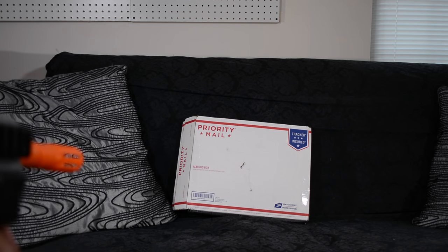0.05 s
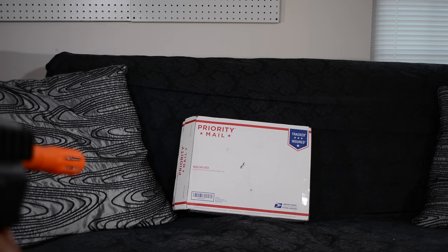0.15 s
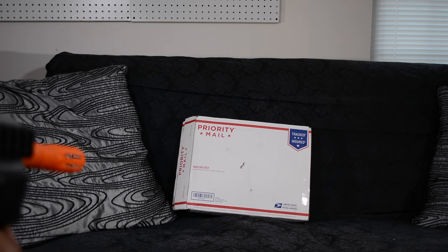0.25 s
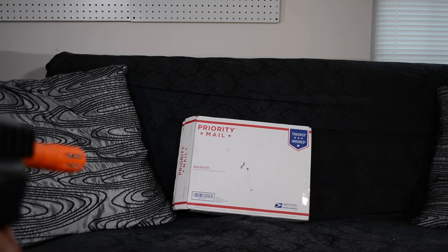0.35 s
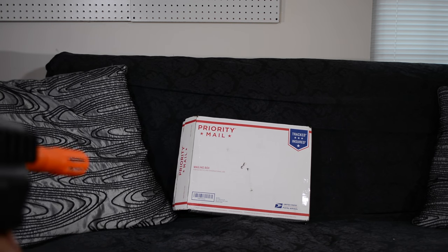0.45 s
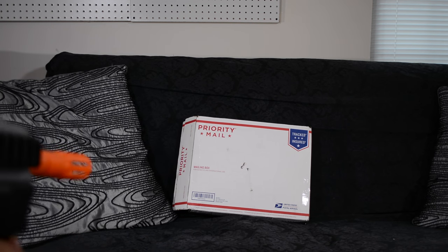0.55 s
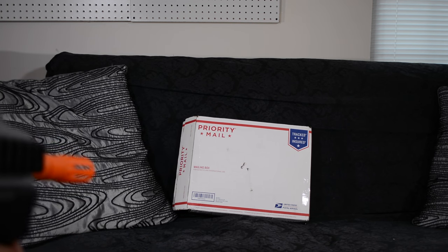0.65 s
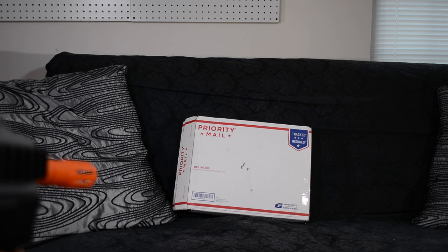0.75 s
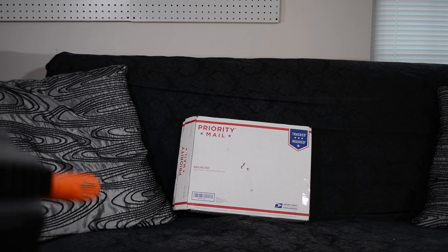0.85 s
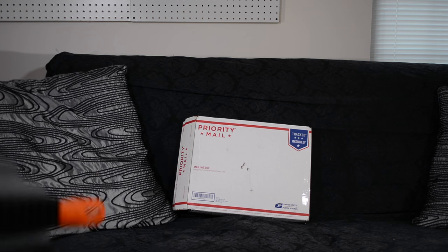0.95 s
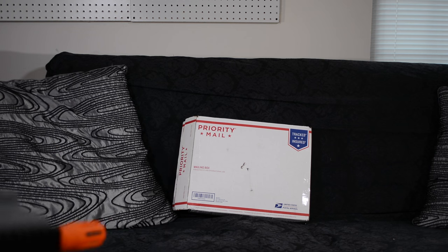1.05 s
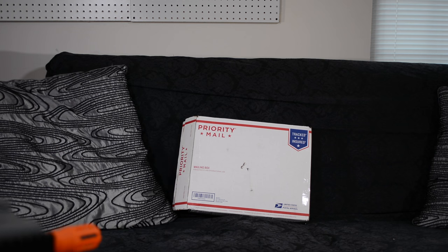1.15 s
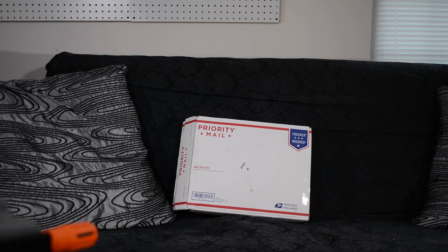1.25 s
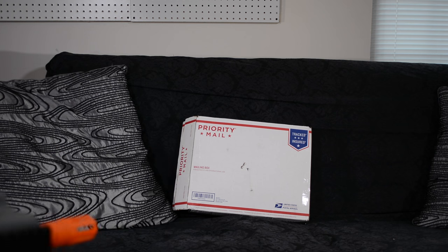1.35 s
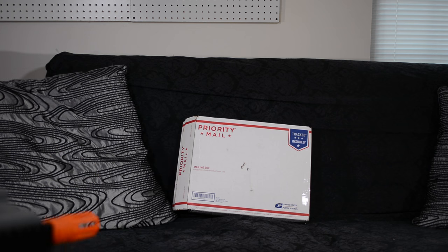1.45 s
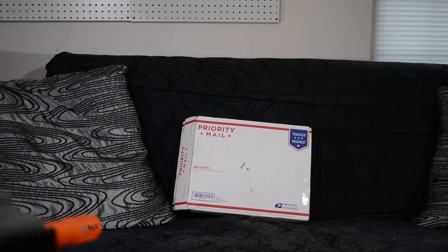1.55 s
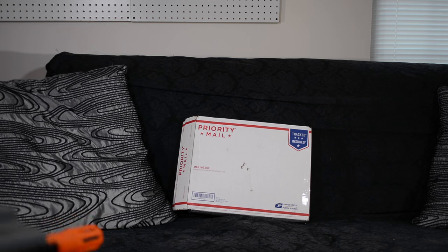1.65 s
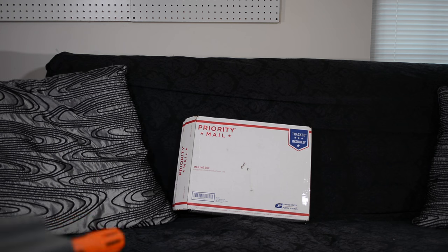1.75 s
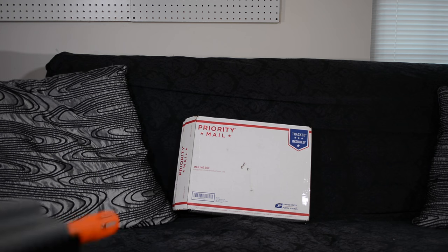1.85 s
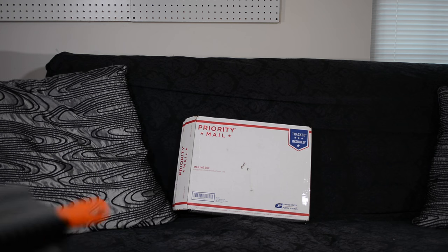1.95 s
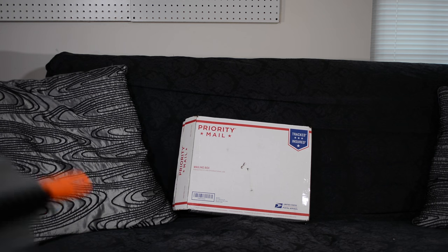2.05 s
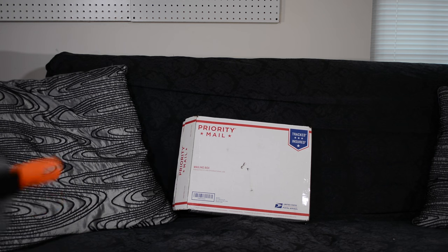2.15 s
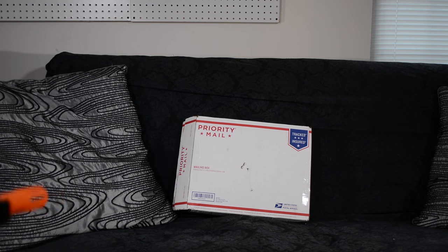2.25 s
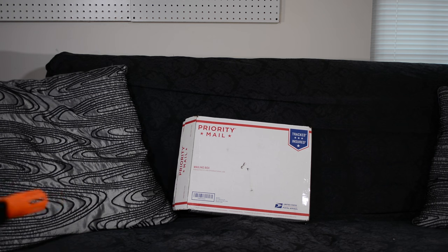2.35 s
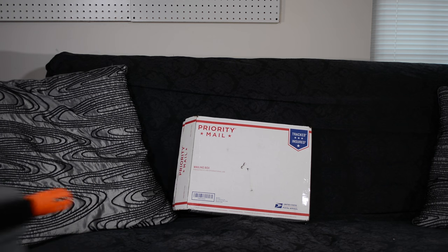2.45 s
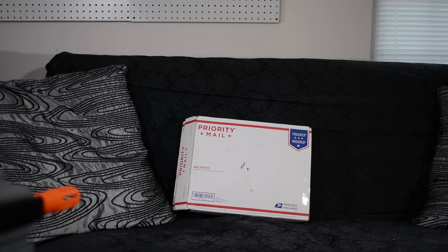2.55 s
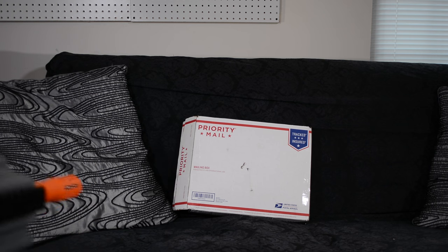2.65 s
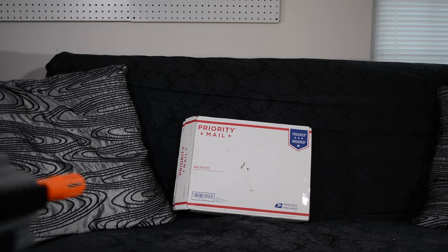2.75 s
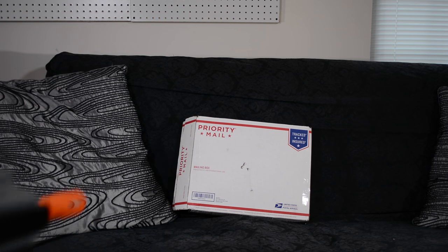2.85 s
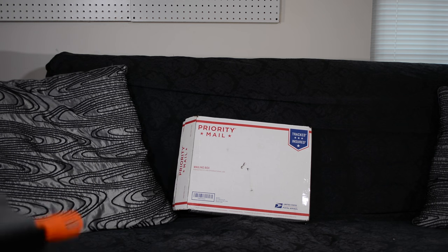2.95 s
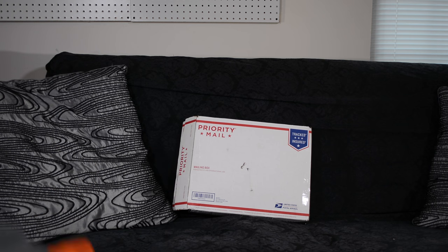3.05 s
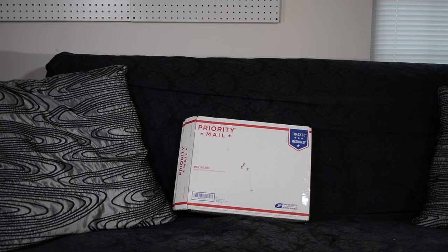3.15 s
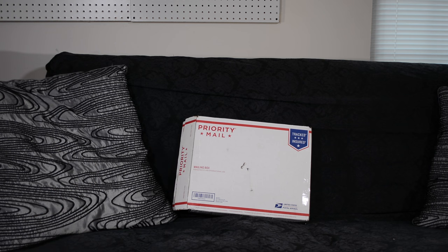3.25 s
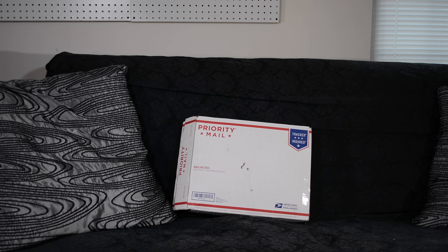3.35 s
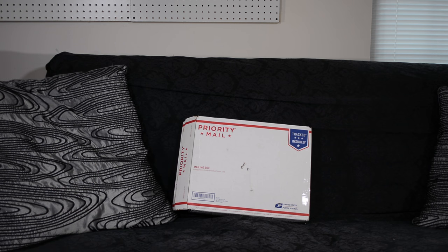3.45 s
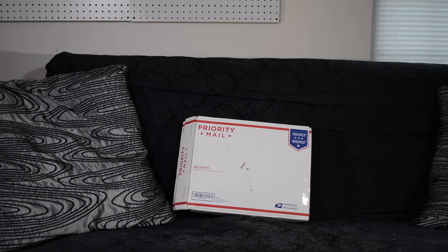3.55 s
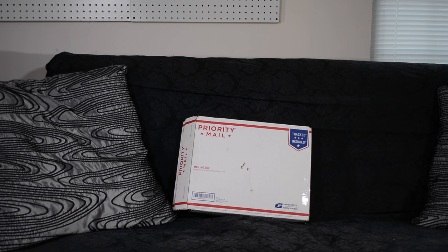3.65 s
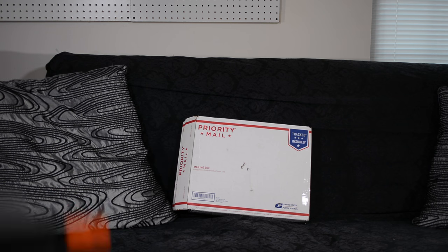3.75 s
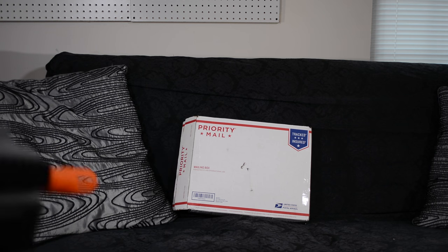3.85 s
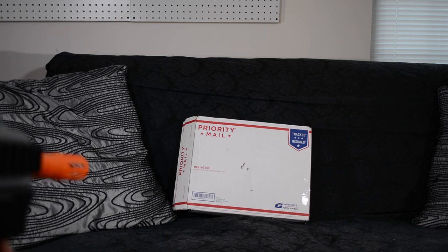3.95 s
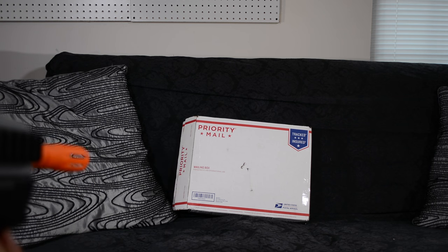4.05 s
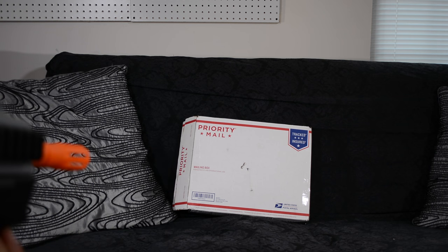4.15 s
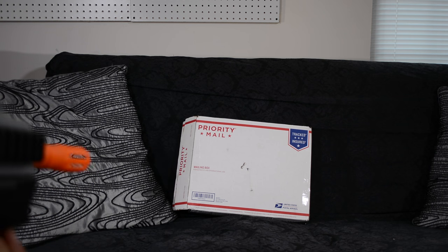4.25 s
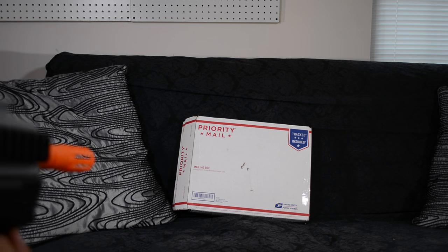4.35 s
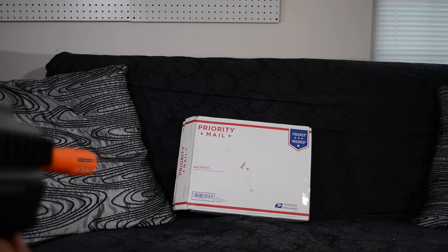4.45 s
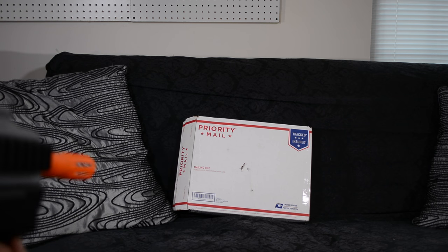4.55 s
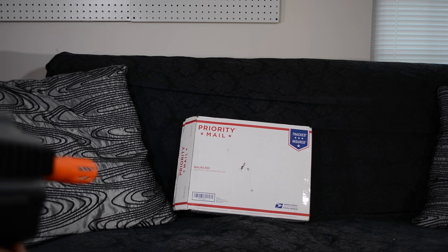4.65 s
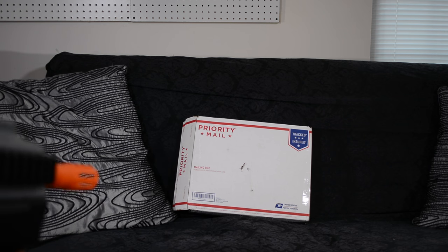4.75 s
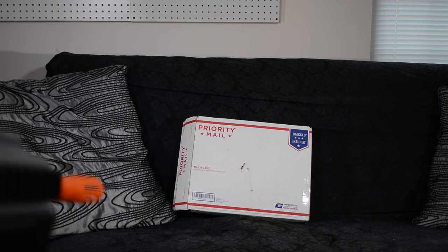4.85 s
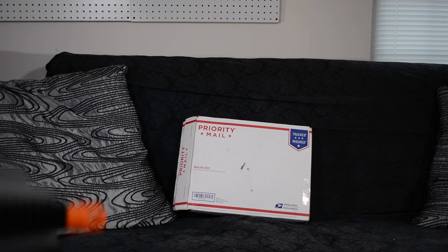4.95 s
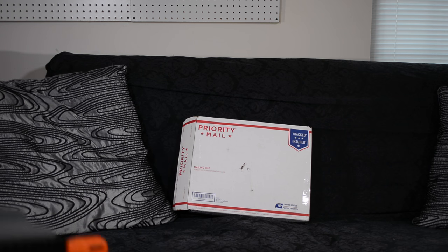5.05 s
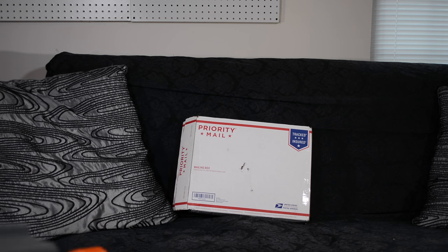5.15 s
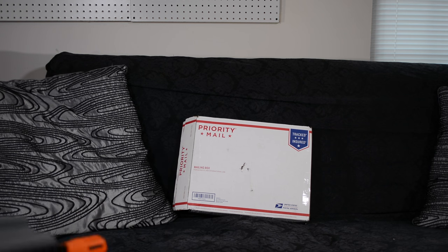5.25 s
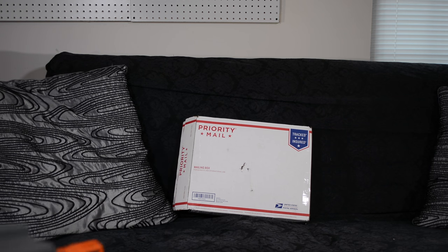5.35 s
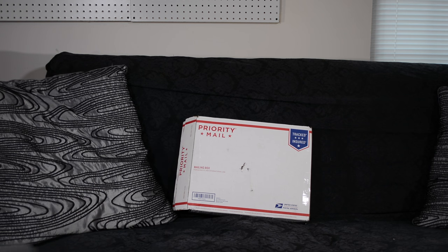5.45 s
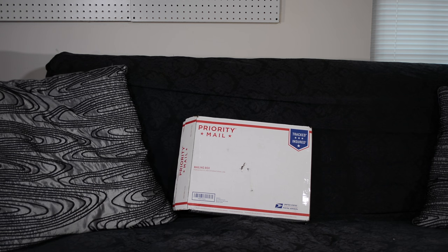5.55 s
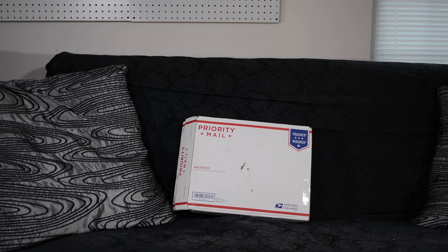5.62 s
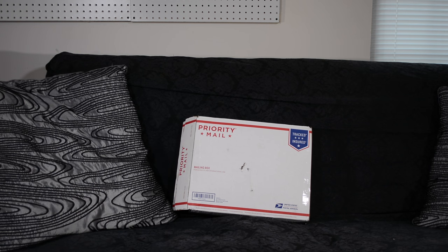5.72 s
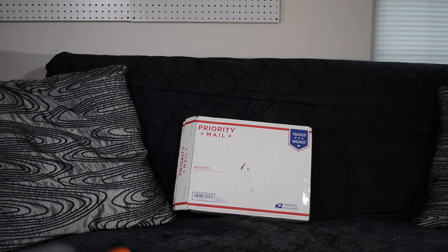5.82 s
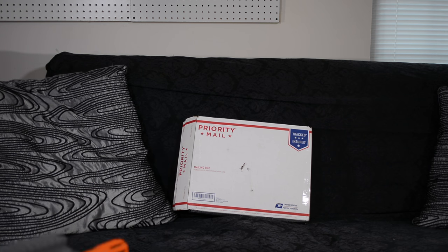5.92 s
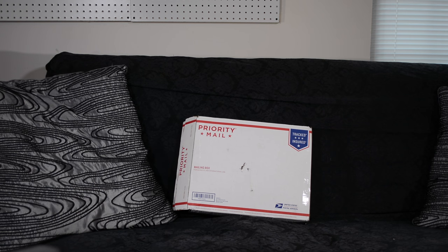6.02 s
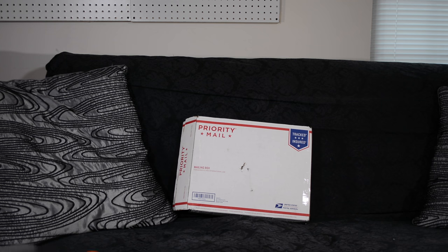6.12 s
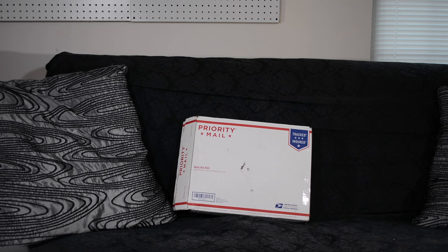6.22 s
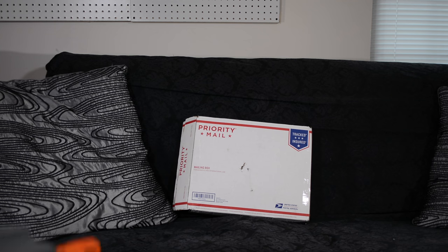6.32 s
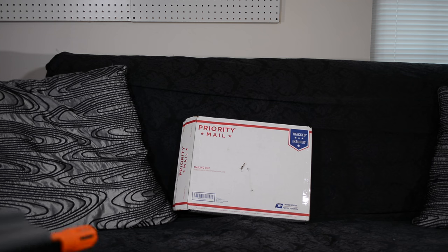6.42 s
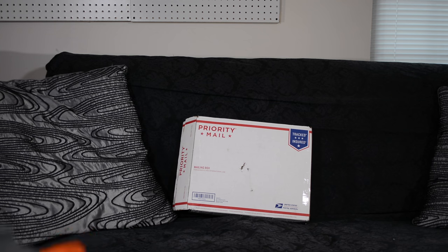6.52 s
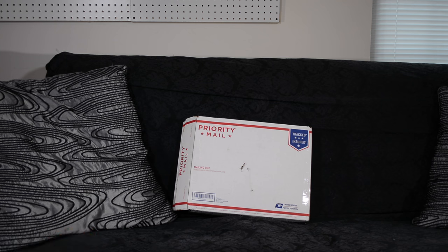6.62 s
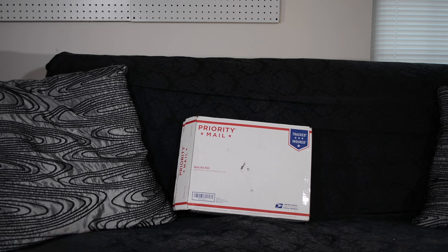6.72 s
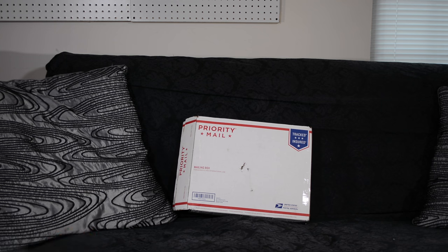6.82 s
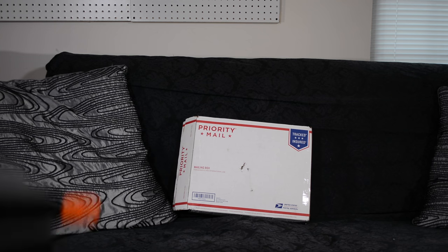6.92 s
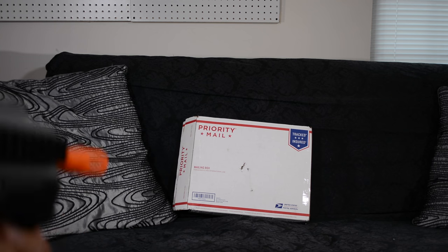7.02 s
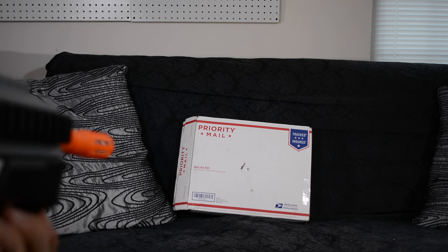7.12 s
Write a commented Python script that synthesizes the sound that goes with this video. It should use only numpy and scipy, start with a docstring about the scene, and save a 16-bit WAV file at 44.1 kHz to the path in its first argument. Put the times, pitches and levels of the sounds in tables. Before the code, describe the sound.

Two loud spring blaster shots hit a cardboard box in a small room, each trailed by rattling bolt cycling and a hard latching clack.

```python
"""A spring-powered foam dart blaster fires twice at a cardboard box on a sofa, close to the microphone.
Each shot sums noise bursts (sear crack, piston slam, dart smack) and damped modes (muzzle pop, box,
ringing spring and tube), and overloads the input softly.
Bolt handling adds latch bursts, shell-filtered clicks and bumps, and sliding friction noise.
A small room adds diffuse tails; quiet air noise and a faint appliance hum lie underneath."""
import sys
import numpy as np
from scipy import signal
from scipy.fft import rfft, irfft, next_fast_len
from scipy.io import wavfile
from scipy.ndimage import uniform_filter1d, map_coordinates

SR = 44100
rng = np.random.default_rng(int(sys.argv[2]) if len(sys.argv) > 2 else 0)


def wav_out(sig):
    """Save sig, one row per channel (or a flat mono array), as 16-bit PCM at SR to the path in sys.argv[1]."""
    wavfile.write(sys.argv[1], SR, np.round(np.clip(np.atleast_2d(sig).T, -1, 1) * 32767).astype(np.int16))


N = 316638


def amp(db):
    """Decibels to gain."""
    return 10 ** (np.asarray(db) / 20)


def unit(x):
    """Scale to rms 1."""
    return x / np.sqrt(np.mean(x ** 2) + 1e-20)


def crest(x):
    """Scale so that the loudest 128 samples (2.9 ms) have rms 1."""
    return x / np.sqrt(uniform_filter1d(x ** 2, size=128).max() + 1e-20)


def along(points, hz):
    """Interpolate (frequency [Hz], value) points on a log frequency axis."""
    point_hz, values = np.transpose(points)
    return np.interp(np.log(hz + 1), np.log(point_hz), values)


def clock(count):
    """Seconds for count samples."""
    return np.arange(count) / SR


def add(track, start_s, sound):
    """Mix a sound into a track at start_s."""
    part = track[round(start_s * SR):][:len(sound)]
    part += sound[:len(part)]


def filtered(x, response):
    """Multiply the spectrum of x by a complex response of frequency."""
    size = next_fast_len(len(x) + SR // 8)
    hz = np.fft.rfftfreq(size, 1 / SR)
    return irfft(rfft(x, size) * response(hz), size)[:len(x)]


def causal(x, gain):
    """Minimum-phase filter with the given gain on an even frequency grid."""
    cepstrum = irfft(np.log(gain + 1e-6))
    half = len(cepstrum) // 2
    # fold the cepstrum onto positive time
    cepstrum[1:half] *= 2
    cepstrum[half + 1:] = 0
    impulse = irfft(np.exp(rfft(cepstrum)))
    return signal.fftconvolve(x, impulse)[:len(x)]


def coloured(x, spectrum, size=4096):
    """Filter x by a (frequency [Hz], level [dB]) spectrum."""
    hz = np.fft.rfftfreq(size, 1 / SR)
    return causal(x, amp(along(spectrum, hz)))


def burst(rise_s, hold_s, t60_s, size=8192):
    """Contact noise that swells, holds and dies away, with spectral gaps partly filled."""
    t = clock(size)
    decay = amp(-60 * np.maximum(t - rise_s - hold_s, 0) / t60_s)
    noise = rng.standard_normal(size) * np.minimum(t / rise_s, 1) * decay
    power = np.abs(uniform_filter1d(np.abs(rfft(noise)) ** 2, size=21))
    return causal(noise, (power / power.mean() + .1) ** -.25)


def fading(spectrum, t60_s, count=SR):
    """Many close modes dying together, heard as fading noise."""
    return unit(coloured(rng.standard_normal(count), spectrum)) * amp(-60 * clock(count) / t60_s)


def ring(modes, attack_s, scatter_db, count=SR):
    """Sum of damped sine modes with randomly scattered strengths and a soft onset."""
    t = clock(count)
    tones = np.zeros(count)
    for k, (hz, db, t60_s) in enumerate(modes):
        level_db = db + scatter_db * rng.standard_normal() - 60 * t / t60_s
        tones += (-1) ** k * amp(level_db) * np.sin(2 * np.pi * hz * t)
    return tones * (1 - np.exp(-t / attack_s))


def make_up(mix, db, bright_db):
    """Levels of the parts of a sound from its strength and brightness."""
    return [db + offset_db + slope * bright_db for offset_db, slope in mix]


# plastic shell resonances: (frequency [Hz], width [Hz], level [dB])
SHELL_MODES = [(115, 140, -9), (275, 106, 1), (441.2, 147, 2), (716, 110, 3), (1002, 120, 0),
               (1342, 300, 0.5), (2346, 610, -2), (3800, 1100, -1.5), (5020, 420, 3.5), (5880, 1300, -3),
               (10780, 5600, -18)]


def shell(hz):
    """Complex response of the hollow plastic body: parallel resonators of alternating sign."""
    total = 0
    for k, (centre_hz, width_hz, db) in enumerate(SHELL_MODES):
        damping = 1j * hz * width_hz
        total = total + (-1) ** k * amp(db) * damping / (centre_hz ** 2 - hz ** 2 + damping)
    return total


# room decay: (frequency [Hz], t60 [s])
ROOM_T60 = [(100, 0.35), (280, 0.37), (500, .31), (800, 0.47), (2000, 0.36), (5000, 0.37), (8000, 0.34),
            (12000, 0.31), (16000, 0.043)]
# wall reflection spectrum: (frequency [Hz], relative level [dB])
WALL_SPECTRUM = [(40, -16.5), (150, -7.5), (450, -1.5), (800, -3), (2000, -4.5), (5000, -4), (9000, 0.5),
                 (16000, -6)]


def in_room(x, wet_db, build_s):
    """Direct sound plus a diffuse tail that builds up as the walls answer."""
    hz, t, cells = signal.stft(rng.standard_normal(SR * 3 // 4), SR, nperseg=256)
    decay = amp(-60 * t / along(ROOM_T60, hz)[:, None])
    tail = signal.istft(cells * decay, SR, nperseg=256)[1]
    tail = tail * (1 - np.exp(-(clock(len(tail)) / build_s) ** 2))
    response = coloured(tail / np.linalg.norm(tail), WALL_SPECTRUM)
    return x + amp(wet_db) * signal.fftconvolve(x, response)[:N]


# room air spectrum: (frequency [Hz], relative density [dB per Hz])
AIR_SPECTRUM = [(25, -11), (100, -8), (260, -9.5), (400, -13.5), (700, -20), (1800, -26.5), (2450, -21),
                (3000, -28.5), (5000, -31), (10000, -39), (16000, -39.5)]
# faint appliance tones: (frequency [Hz], rms level [dB])
HUM_TONES = [(118.4, -80), (263.8, -80.5), (2428, -80)]


def room_tone():
    """Quiet air noise with steady sines of appliance hum."""
    t = clock(N)
    hum = sum(amp(db) * np.sqrt(2) * np.sin(2 * np.pi * hz * t) for hz, db in HUM_TONES)
    air = unit(coloured(rng.standard_normal(N), AIR_SPECTRUM))
    return amp(-63.5) * air + hum


def friction(spectrum, slips_per_s, grit):
    """Sparse random slips of uneven size over smooth rubbing noise."""
    slips = (rng.random(N) < slips_per_s / SR) * rng.uniform(-1.2, 1, N)
    return unit(coloured(rng.standard_normal(N) + grit * unit(slips), spectrum))


STROKE_RISE_S, STROKE_SAG_DB_PER_S, STROKE_STOP_DB_PER_S = 0.029, 34.5, 263.5


def push(length_s, sag_db_per_s):
    """Envelope of one movement: it gets going, eases off and stops."""
    t = clock(2 * SR)
    fall_db = sag_db_per_s * t + STROKE_STOP_DB_PER_S * np.maximum(t - length_s, 0)
    return np.minimum(t / STROKE_RISE_S, 1) * amp(-fall_db)


# bolt slides: (start [s], length [s], strength [dB], brightness [dB])
STROKES = [(1.727, 0.045, -32.5, -3.5), (1.863, .12, -39, 3.5), (2.002, 0.086, -54, -1),
           (2.236, 0.04, -35, -1), (2.677, 0.089, -48.5, -2), (2.871, 0.074, -45.5, 0.5),
           (2.942, 0.052, -46, -12), (5.502, 0.067, -38.5, -2.5), (5.614, 0.18, -40, 3),
           (6.004, 0.022, -40.5, -4.5), (6.4, .09, -49.5, 0), (6.488, 0.057, -42.5, -0.5),
           (6.538, .045, -41.5, -5), (7.028, 0.018, -54.5, -4.5)]
# blaster shifting in the hands, also timing the rattles: (start [s], length [s], strength [dB])
HANDLING = [(1.696, 1.38, -64.5), (3.078, 0.27, -69), (3.378, 0.55, -74), (5.15, 1.1, -66.5),
            (6.424, 0.29, -63), (6.919, 0.28, -73)]
# scrape, rasp, hiss: (level re strength [dB], gain per brightness [dB/dB])
STROKE_MIX = [(-0.5, -0.1), (-1, 0.45), (-9.5, 1.95)]
# sliding spectra: (frequency [Hz], relative density [dB per Hz])
SCRAPE_SPECTRUM = [(40, -26), (200, -16), (330, -10), (480, -6.5), (620, -6), (750, 3), (950, -5.5),
                   (1350, -2.5), (2100, -6), (3000, -9.5), (6000, -60.5)]
RASP_SPECTRUM = [(1200, -42), (2500, -3.5), (3500, -2), (4200, -1.5), (5100, -2.5), (6400, -4),
                 (8000, -18.5), (14000, -43.5)]
HISS_SPECTRUM = [(3500, -42), (7000, 0), (9000, -2.5), (12500, -7.5), (14500, -14.5), (16000, -24.5)]
HANDLING_BRIGHT_DB = 0.5
JUDDER_PER_S, JUDDER_DB = 85, 1.9


def strokes():
    """Friction of the bolt along shell and guides, and faint rubbing hands; an uneven push judders it."""
    layers = [friction(SCRAPE_SPECTRUM, slips_per_s=230, grit=0.93),
              friction(RASP_SPECTRUM, slips_per_s=700, grit=0.67),
              friction(HISS_SPECTRUM, slips_per_s=2400, grit=.8)]
    moves = [(start_s, push(length_s, STROKE_SAG_DB_PER_S), db, bright_db)
             for start_s, length_s, db, bright_db in STROKES]
    moves += [(start_s, push(length_s, 0), db, HANDLING_BRIGHT_DB) for start_s, length_s, db in HANDLING]
    gains = np.zeros((3, N))
    for start_s, envelope, db, bright_db in moves:
        for gain, part_db in zip(gains, make_up(STROKE_MIX, db, bright_db)):
            add(gain, start_s, amp(part_db) * envelope)
    wander = map_coordinates(rng.standard_normal(SR // 8), [clock(N) * JUDDER_PER_S], mode="mirror")
    sliding = amp(JUDDER_DB * wander) * (gains * layers).sum(axis=0)
    return in_room(sliding, wet_db=-9, build_s=0.0015)


# bolt against its end stops, hardest when pushed home: (time [s], strength [dB])
BUMPS = [(1.731, -38.5), (2.876, -32.5), (2.9346, -26.5), (2.9449, -29.5), (2.951, -36), (5.287, -47.5),
         (5.502, -39), (6.507, -34.5), (6.559, -26), (6.567, -31)]
# bump softened by the hand: (frequency [Hz], relative density [dB per Hz])
BUMP_SPECTRUM = [(90, -3), (220, 4), (450, 2.5), (900, -6.5), (1600, 1), (2600, -10.5), (7000, -26),
                 (16000, -31)]


def bumps():
    """One blunt push through the shell, plus a short shudder of the parts inside."""
    out = np.zeros(N)
    for time_s, db in BUMPS:
        blow = filtered(signal.unit_impulse(SR // 8), shell)
        shudder = filtered(burst(rise_s=.002, hold_s=.002, t60_s=0.068), shell)
        add(out, time_s, amp(db + 0.5) * crest(coloured(blow, BUMP_SPECTRUM)))
        add(out, time_s, amp(db - 1.5) * crest(coloured(shudder, BUMP_SPECTRUM)))
    return in_room(out, wet_db=-12.5, build_s=.006)


RATTLES_PER_S, RATTLE_DB, RATTLE_BRIGHT_DB, RATTLE_SPREAD_DB = 12, 7, -2.5, 1.5


def rattles():
    """Loose parts tap once at a chance moment in each time slot of the handling: rows as in CLICKS."""
    taps = []
    for start_s, length_s, db in HANDLING:
        for slot, (when, size, colour) in enumerate(rng.uniform(-1, 1, (40, 3))):
            delay_s = (slot + (when + 1) / 2) / RATTLES_PER_S
            if delay_s < length_s:
                tap_db = db + RATTLE_DB + RATTLE_SPREAD_DB * size
                bright_db = RATTLE_BRIGHT_DB + 2 * RATTLE_SPREAD_DB * colour
                taps.append((start_s + delay_s, tap_db, bright_db))
    return taps


# plastic contacts of trigger, bolt and grip: (time [s], strength [dB], brightness [dB])
CLICKS = [(.538, -33.5, 22), (.9632, -40.5, 7), (1.0312, -36.5, 5.5), (1.4274, -56.5, 1), (1.4996, -52, -6),
          (1.6263, -55, -8), (1.6493, -27.5, 1), (1.738, -33.5, -5), (2.184, -38, -2), (2.191, -33, -1.5),
          (2.243, -37.5, -6), (2.2495, -30, 0.5), (2.4033, -60.5, -22), (2.4637, -36.5, 2),
          (2.5505, -54, -20), (2.6038, -30, 0), (2.6559, -32, 10), (2.705, -48.5, -8), (2.7479, -31.5, 5),
          (2.768, -40, -9), (2.967, -45, 7), (2.9917, -45, 10), (3.1288, -49.5, -9), (3.149, -52, -11),
          (3.248, -55.5, -9.5), (3.355, -62.5, -12), (3.503, -59, 3), (3.708, -60.5, -9),
          (3.8215, -45, 14.5), (3.9494, -57, -3), (4.0672, -60.5, -8), (4.8055, -37, 10.5), (4.831, -42, 0),
          (4.9441, -40, 8.5), (5.1275, -48.5, -7), (5.2199, -35.5, 8), (5.228, -39.5, 7),
          (5.309, -52, -5.5), (5.3447, -41.5, 9), (5.359, -48, -11), (5.3696, -31, 1.5),
          (5.514, -37.5, -11.5), (5.65, -31.5, 2), (5.739, -30.5, 14.5), (5.967, -49, -9),
          (6.0229, -34.5, 3.5), (6.052, -44.5, -14.5), (6.149, -46.5, -9), (6.1724, -37.5, 2),
          (6.227, -48.5, -15), (6.3015, -44, 3.5), (6.3887, -29, 0.5), (6.4123, -36.5, 15),
          (6.4579, -35.5, -5), (6.479, -43.5, 15), (6.5526, -33.5, 10.5), (6.6286, -39, 3),
          (6.6745, -44, 1.5), (6.691, -47.5, -2), (6.8187, -60, -18), (7.0396, -45, 10), (7.126, -60, -14)]
# thud, knock, click, tick: (low edge [Hz], high edge [Hz])
CLICK_BANDS = [(70, 600), (600, 2500), (2500, 7000), (7000, 16000)]
# thud, knock, click, tick: (level re strength [dB], gain per brightness [dB/dB])
CLICK_MIX = [(-11, -0.52), (1, -.5), (-1, .5), (-18, 0.81)]
# wire spring wash: (frequency [Hz], relative density [dB per Hz])
WIRE_SPECTRUM = [(400, -34), (750, -10), (1400, -1), (2600, -21), (3100, -8.5), (4200, -6.5), (5150, 4.5),
                 (6200, -32), (8000, -14), (14000, -34.5)]
# small return spring modes: (frequency [Hz], relative level [dB], t60 [s])
RETURN_SPRING_MODES = [(3440, -5, 0.19), (4140, -4, 0.26), (4700, -10.5, 0.26), (5040, -5.5, 0.15),
                       (5050, -2.5, 0.25), (5870, -9.5, 0.5), (8270, -16, .27)]


def clicks():
    """Short contacts excite the shell in four bands and set the wire and return springs ringing."""
    sharp, thuds, wires = np.zeros((3, N))
    bands = [signal.butter(3, edges_hz, "bandpass", fs=SR, output="sos") for edges_hz in CLICK_BANDS]
    for time_s, db, bright_db in list(CLICKS) + rattles():
        thud_db, knock_db, click_db, tick_db = make_up(CLICK_MIX, db, bright_db)
        # the parts wobble a little longer than they crack
        wobble = filtered(burst(rise_s=0.00042, hold_s=0.001, t60_s=0.042), shell)
        crack = filtered(burst(rise_s=0.00027, hold_s=0.0011, t60_s=0.026), shell)
        sources = (wobble, wobble, crack, crack)
        thud, knock, click, tick = (crest(signal.sosfilt(band, x)) for band, x in zip(bands, sources))
        add(thuds, time_s - .002, amp(thud_db) * thud)
        add(sharp, time_s, amp(knock_db) * knock + amp(click_db) * click + amp(tick_db) * tick)
        wash = fading(WIRE_SPECTRUM, t60_s=0.45, count=SR // 2)
        add(wires, time_s, amp(click_db - 42) * wash)
        springs = ring(RETURN_SPRING_MODES, attack_s=.001, scatter_db=5.5, count=SR // 3)
        add(wires, time_s, amp(click_db - 26) * springs)
    sharp = in_room(sharp, wet_db=-7.5, build_s=.004)
    return sharp + in_room(thuds, wet_db=-9.5, build_s=0.0073) + wires


# piston latching at the end of the pull: (time [s], strength [dB])
LATCHES = [(2.0755, -11), (5.820, -10.5)]
# latch noise: (frequency [Hz], relative density [dB per Hz])
LATCH_SPECTRUM = [(30, -24), (200, -13), (480, -4), (1350, -2), (2700, -2.5), (3500, 3.5), (4400, 0),
                  (6000, 2.5), (8200, -9.5), (11000, -9), (16000, -22)]
# catch modes: (frequency [Hz], relative level [dB], t60 [s])
CATCH_MODES = [(2105, -4.5, 0.12), (3385, -3, 0.14), (3420, 4, 0.26), (3920, -5.5, 0.2), (5240, -15.5, .2),
               (5900, -7, 0.25), (6800, -0.5, .25)]


def latches():
    """The catch rides up its ramp, drops into the notch and leaves the tight spring buzzing."""
    out = np.zeros(N)
    for time_s, db in LATCHES:
        ramp = burst(rise_s=0.0042, hold_s=0.00091, t60_s=0.008)
        notch = burst(rise_s=0.00044, hold_s=0.0025, t60_s=0.029)
        add(out, time_s - .005, amp(db - 11) * crest(coloured(ramp, LATCH_SPECTRUM)))
        add(out, time_s, amp(db) * crest(coloured(notch, LATCH_SPECTRUM)))
        add(out, time_s, amp(db - 8) * fading(LATCH_SPECTRUM, t60_s=0.17))
        add(out, time_s, amp(db - 20) * ring(CATCH_MODES, attack_s=.001, scatter_db=1.5))
    return in_room(out, wet_db=-8.5, build_s=0.0035)


# shots: (sear [s], piston [s], muzzle [s], dart on box [s], tube damped [s], muzzle level [dB],
#         dart strength [dB], box ring level [dB], extra spring damping [dB/s per kHz])
SHOTS = [(0.3738, 0.3794, .3875, .4058, .687, -14.5, -1.5, -13.5, -2.5),
         (4.515, 4.5202, 4.5285, 4.5465, 4.785, -11, -1.5, -19.5, 13.5)]
# blow and coil noise: (frequency [Hz], relative density [dB per Hz])
SEAR_SPECTRUM = [(30, -17), (300, -9.5), (600, -10), (1600, -12), (2700, -12), (4200, -2), (5300, 3.5),
                 (6500, -3.5), (8000, -10.5), (16000, -18)]
PISTON_SPECTRUM = [(30, -24), (120, -12.5), (450, -1.5), (850, -3.5), (1300, 1.5), (2100, 1), (2800, -4),
                   (4800, -4.5), (7000, -18), (10000, -26), (16000, -27.5)]
SMACK_SPECTRUM = [(30, -14.5), (110, -11), (300, 1.5), (520, 4), (900, -3), (2000, -9.5), (3000, -6),
                  (5000, -2), (8000, -15), (16000, -35.5)]
COIL_SPECTRUM = [(300, -21), (550, -18.5), (700, -0.5), (800, -4.5), (920, -3), (1050, -9), (1400, -11),
                 (2000, -27), (4000, -45)]
# box, plunger tube and main spring modes: (frequency [Hz], relative level [dB], t60 before grip [s])
BOX_MODES = [(218, -5, 0.16), (314.6, -7, 0.25), (410, -4, .18), (458, -1, 0.19), (497, -2, .2),
             (532.5, 3.5, 0.18), (642.2, -7, 0.39), (719, -9.5, 0.18), (830, -9, .16), (981, -10.5, 0.23)]
TUBE_MODES = [(773, 0, 1.05), (790, -13, .8)]
SPRING_MODES = [(76, -17, 0.8), (104, -3, 1.4), (209, -5, 1.2), (301, -5, 1.3), (664, -16, 1.4),
                (677, -12.5, 1.3), (712, -7, .9), (763, -7, 1.7), (813, -5, 0.97), (810, -8.5, 2.1),
                (909, -7.5, 4), (877, -17, 3), (928, -10.5, 1.3), (990, -9.5, 0.94), (1240, -13, .7),
                (1400, -13, .9)]
MUZZLE_MODES = [(48, -17, 0.092), (207.4, 0.5, 0.15)]
SEAR_DB, PISTON_DB, BODY_DB, COIL_DB = -1.8, -2.8, -15.3, -44.8
SPRING_DB, TUBE_DB = -40.5, -26.5


def shots():
    """Sear, piston and dart blows are noise bursts in the room; muzzle, box, spring and tube ring dry."""
    blows, tones = np.zeros(N), np.zeros(N)
    for (sear_s, piston_s, muzzle_s, dart_s, damped_s,
         muzzle_db, dart_db, box_db, damping) in SHOTS:
        snap = burst(rise_s=0.00015, hold_s=0.0011, t60_s=0.011)
        slam = burst(rise_s=0.0045, hold_s=0.0044, t60_s=0.031)
        smack = burst(rise_s=0.00015, hold_s=0.0039, t60_s=0.081)
        add(blows, sear_s, amp(SEAR_DB) * crest(coloured(snap, SEAR_SPECTRUM)))
        add(blows, piston_s - .001, amp(PISTON_DB) * crest(coloured(slam, PISTON_SPECTRUM)))
        # the whole body rattles after the slam
        add(blows, piston_s, amp(BODY_DB) * fading(PISTON_SPECTRUM, t60_s=0.12))
        add(blows, dart_s, amp(dart_db - 4.5) * crest(coloured(smack, SMACK_SPECTRUM)))
        add(tones, muzzle_s, amp(muzzle_db) * ring(MUZZLE_MODES, attack_s=0.00071, scatter_db=.5))
        add(tones, dart_s, amp(box_db) * ring(BOX_MODES, attack_s=0.00051, scatter_db=0.53))
        # positive damping shortens the spring's higher notes most; negative lengthens them
        gripped = [(hz, db, 60 / (60 / t60_s + damping * hz / 1000)) for hz, db, t60_s in SPRING_MODES]
        spring = ring(gripped, attack_s=0.0091, scatter_db=3.5, count=2 * SR)
        add(tones, piston_s, amp(SPRING_DB) * spring)
        # jostling coils: a rough band around the clear notes
        add(tones, piston_s, amp(COIL_DB) * fading(COIL_SPECTRUM, t60_s=1.4, count=2 * SR))
        # the tube rings until the shifting grip damps it
        grip = amp(-60 * np.maximum(piston_s + clock(SR) - damped_s, 0) / 0.23)
        tube = ring(TUBE_MODES, attack_s=0.0084, scatter_db=1.0)
        add(tones, piston_s, amp(TUBE_DB) * grip * tube)
    return in_room(blows, wet_db=-4, build_s=0.0064) + tones


def scene():
    """Blaster, box and room as one microphone hears them."""
    return (room_tone() + strokes() + bumps() + clicks() + latches() + shots())[None]


TOP_HZ = 16200


def record(dry, top=0.52, hardness=4):
    """Cut deep rumble, overload softly towards the top level, then cut above the band limit."""
    highpass = signal.butter(2, 30, "highpass", fs=SR, output="sos")
    passed = signal.sosfilt(highpass, dry[0])
    clipped = passed / (1 + np.abs(passed / top) ** hardness) ** (1 / hardness)
    # 1 dB less per 10 Hz, down to -100 dB
    return filtered(clipped, lambda hz: amp(-np.clip((hz - TOP_HZ) / 10, 0, 100)))[None]


dry = scene()
out = record(dry)
wav_out(out)
```